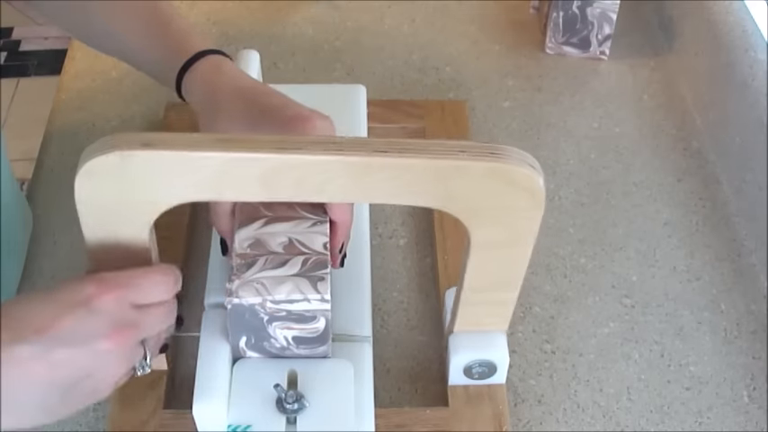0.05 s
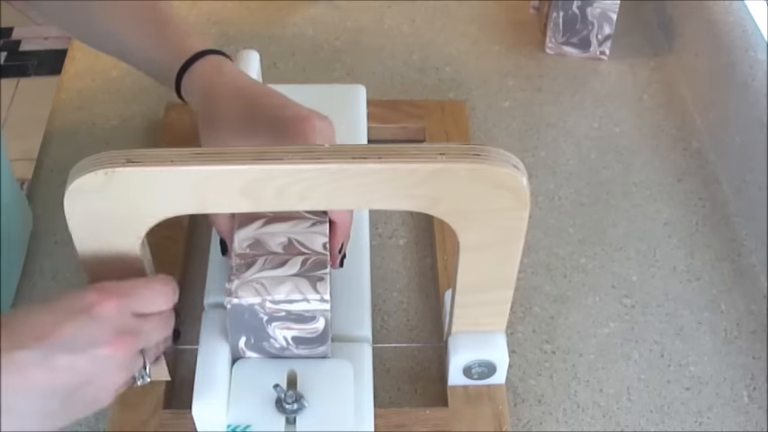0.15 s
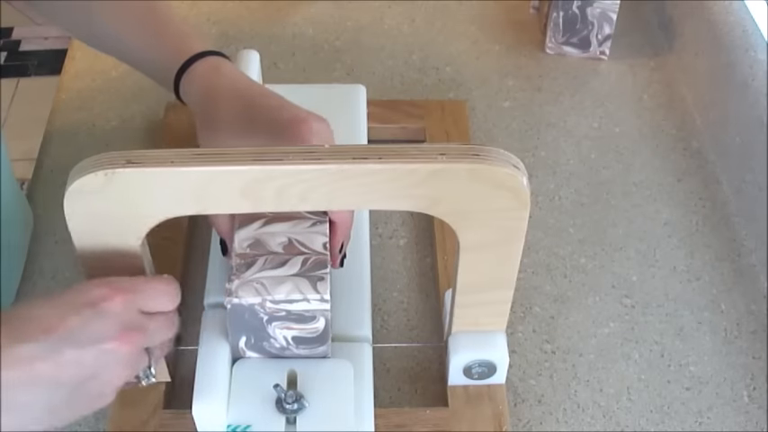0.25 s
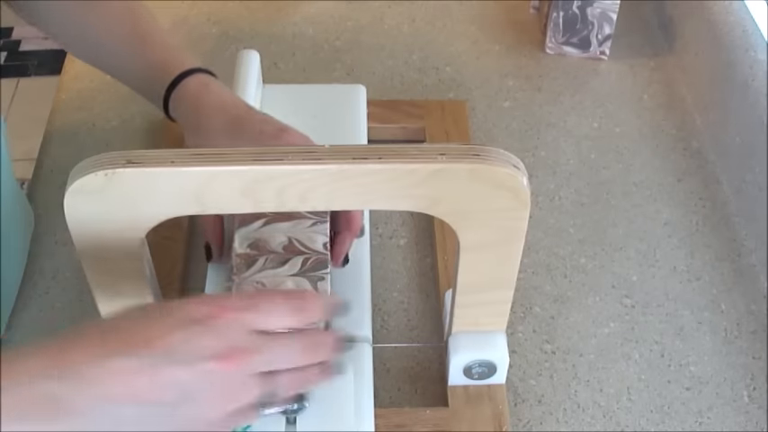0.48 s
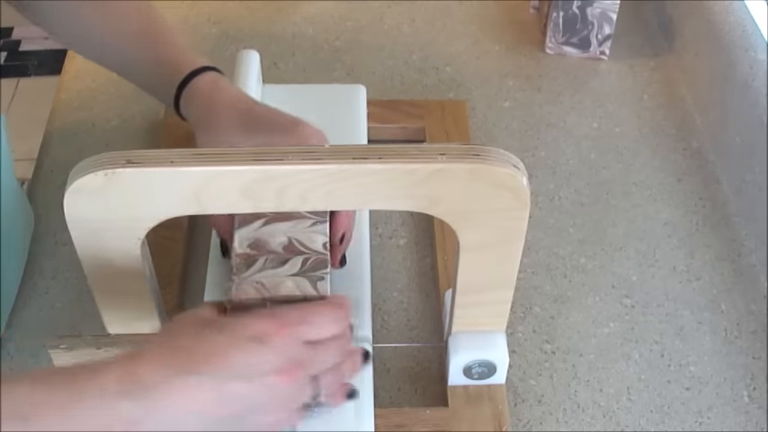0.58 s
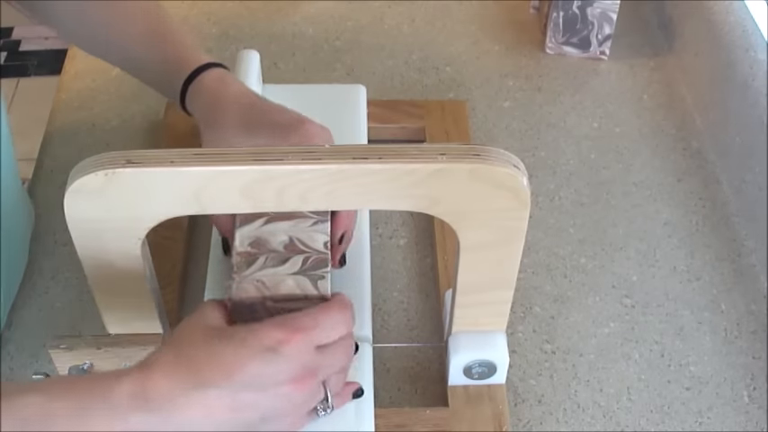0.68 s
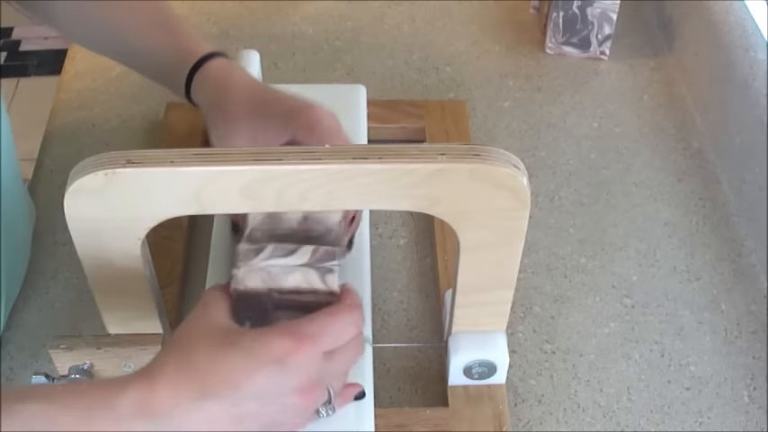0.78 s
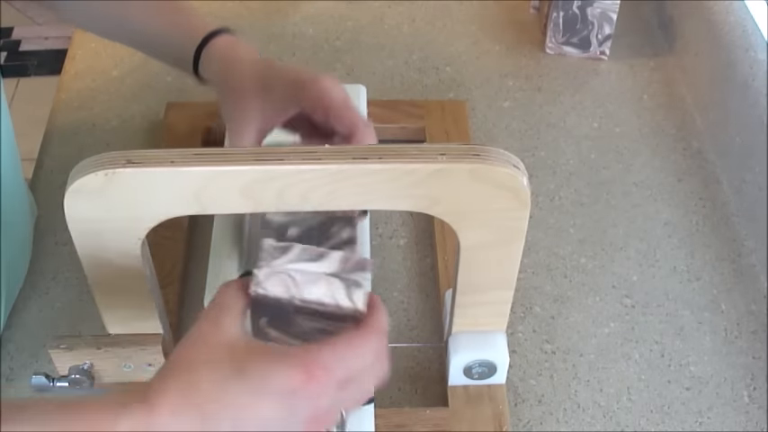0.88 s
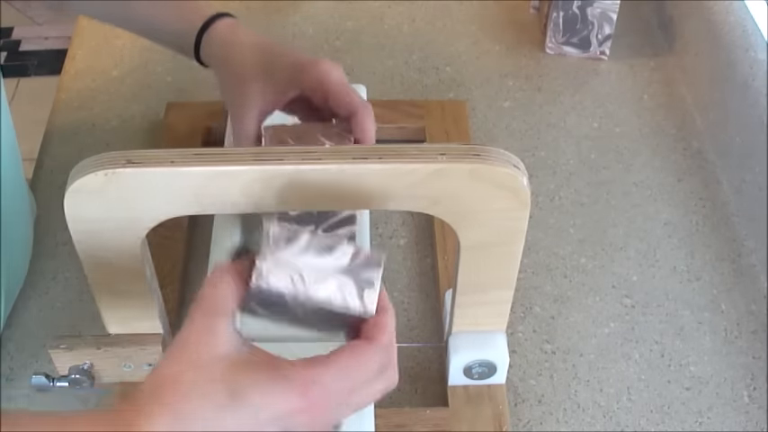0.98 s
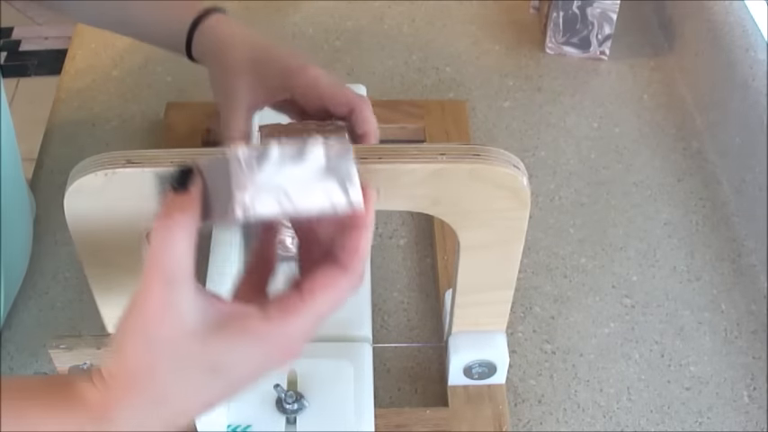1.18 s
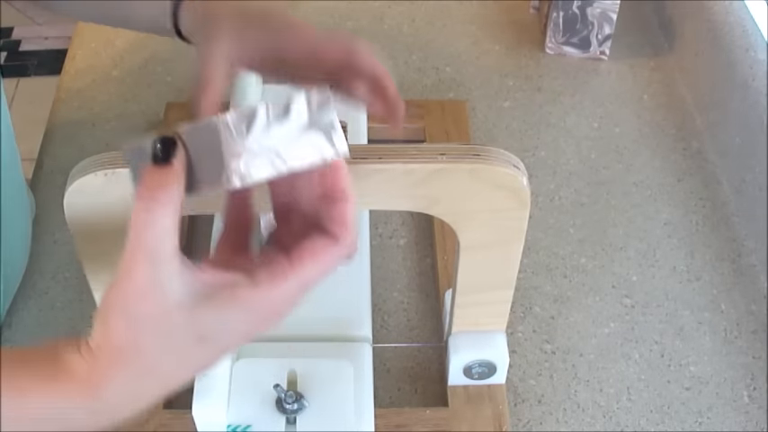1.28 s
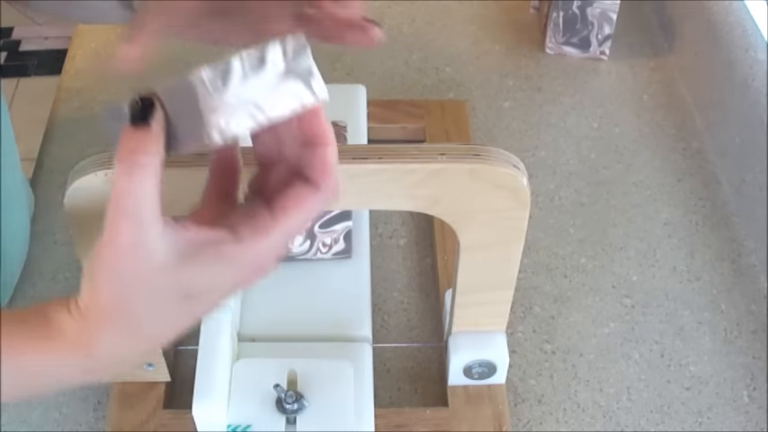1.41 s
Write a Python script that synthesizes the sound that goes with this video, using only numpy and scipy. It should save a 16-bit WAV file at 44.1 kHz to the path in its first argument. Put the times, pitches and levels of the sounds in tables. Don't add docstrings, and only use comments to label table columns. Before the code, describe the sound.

One hard clack of a wire cutter's wooden arm on plastic, with a wiry snap just before

```python
import sys
import numpy as np
from scipy import signal
from scipy.fft import rfft, irfft
from scipy.io import wavfile
from scipy.ndimage import uniform_filter1d

SR = 44100
rng = np.random.default_rng(int(sys.argv[2]) if len(sys.argv) > 2 else 0)


def invert_db(level):
    return 10 ** (np.asarray(level, dtype=float) / 20)


def unload_wav(signal):
    wavfile.write(
        sys.argv[1],
        SR,
        np.round(np.clip(np.atleast_2d(signal).T, -1, 1) * 32767).astype(np.int16),
    )


N = 63945
T = np.arange(N) / SR

# pitch_hz [Hz], level_db [dB per Hz]
AIR_SPECTRUM = [(15, -56), (25, -25), (360, -3.5), (516, -9), (739, -8.5), (1810, -15.5), (5330, -22.5),
                (10600, -28), (11500, -27.5), (15000, -69), (22000, -120)]
AIR_DB, AIR_PATCHY_DB = -53.5, 2

# start_s [s], peak_db [dB], pitch_hz [Hz]
LENS_TICKS = [(.0950, -36, 4600), (.0995, -48, 5500), (.1125, -46, 4600), (.130, -50, 4600),
              (.180, -48, 5500), (.5795, -41, 6000), (1.2470, -40, 4600), (1.2478, -46, 7400),
              (1.2642, -49, 5500), (1.2808, -45, 5000), (1.3143, -46, 4700), (1.348, -51, 5000),
              (1.415, -48, 4900), (1.448, -48, 4800)]
TICK_T60_S, TICK_BROAD_DB = .008, -5

LEAD_END_S, LEAD_DB, LEAD_RISE_S, LEAD_HZ, LEAD_BROAD_DB = .2205, -45, .016, 1000, -3
BOOM_HZ, BOOM_DB, BOOM_CREST_S, BOOM_RISE_S = 174, -34, .305, 0.019

# start_s [s], peak_db [dB]
WIRE_SLAPS = [
    (.2227, -13.5),
    (.2254, -21.5),
    (.2322, -29),
    (.2362, -16.5),
]
# pitch_hz [Hz], level_db [dB], t60_s [s]
WIRE_NOTES = [(654, -7, 0.05), (1230, -3, 0.0082), (2446, -2, 0.023), (3240, -22, .015), (3795, -7, 0.09),
              (3836, -1, 0.048), (4980, 0, 0.015), (5120, -2.5, 0.02), (5640, 3.5, 0.012),
              (7250, -6, 0.021), (8600, -31, 0.024), (11020, -32, 0.013)]
WIRE_DAMP = 0.62
RATTLE_START_S, RATTLE_END_S, RATTLE_DB = .2222, .2415, -16
PING_S, PING_DB, PING_HZ = .2208, -19.5, 6060

# pitch_hz [Hz], t60_s [s]
ROOM_T60 = [(120, 0.38), (300, 1), (600, 0.73), (1500, 0.76), (3000, 0.71), (5500, 0.56), (8000, 0.58),
            (11000, 0.25)]
# pitch_hz [Hz], level_db [dB]
ROOM_COLOUR = [(120, 8), (350, -6), (600, -1.5), (1100, -2), (1700, -4), (2900, -2), (4200, -5),
               (11000, -11)]
WIRE_ROOM_DB, ARM_ROOM_DB, ROOM_BUILD_S = -34, -26.5, 0.006

# start_s [s], peak_db [dB]
ARM_CLACKS = [
    (.2408, -11),
    (.2414, -15),
    (.2430, -26),
]
# pitch_hz [Hz], level_db [dB], t60_s [s]
ARM_NOTES = [(599, -7.5, 0.036), (1264, -3.5, 0.011), (1699, -0.5, .015), (2828, 4, 0.014),
             (3373, 0, 0.015), (4247, 5, 0.024), (6000, -33, 0.002), (8800, -14, .004)]
ARM_DAMP, ARM_ROOM_DAMP = 0.72, 0.51
CRACK_DB, CRACK_S = -11, .0009

# pitch_hz [Hz], level_db [dB], crest_s [s after the clack]
SLAB_NOTES = [(261.2, -17, 0.053), (539, -4, 0.02), (612, -4.5, 0.043), (838, -11.5, 0.075),
              (924.3, -8.5, 0.059), (1205, -8, 0.022), (1490, -1.5, 0.019), (1654, -6, 0.027),
              (1744.5, -7.5, 0.06), (1924, -5.5, 0.02), (2899, 0, 0.037), (3170, -11.5, 0.063)]
BASE_DB, BASE_SHARPNESS = -29.5, 1.94

# start_s [s], full_depth_s [s], above_hz [Hz], spared_share [fraction of lines]
DROPOUTS = [
    (.355, 0, 5600, .03),
    (.973, .002, 2500, .05),
    (1.059, 0, 2500, .05),
    (1.177, .018, 2200, .06),
    (1.400, 0, 2300, .03),
]
DROP_FADE_S, SPARED_GAIN, DROP_TOP_HZ, DROP_LOW_HZ = .016, 4.2, 10400, 150

CUTTER_LOW_HZ, MIC_LOW_HZ, MIC_TOP_HZ = 130, 89, 11300
GAIN_S, GAIN_DB, GAIN_RISE_S, GAIN_SETTLE_S = 0.17, 1, 0.0017, 0.025
PEAK_CEILING = .41


def at_hz(points, hz):
    table = np.array(points)
    return np.interp(np.log(hz), np.log(table[:, 0]), table[:, 1])


def rms_one(x):
    return x / np.sqrt(np.mean(x ** 2) + 1e-20)


def high_pass(x, order, hz):
    return signal.sosfilt(signal.butter(order, hz, "high", fs=SR, output="sos"), x)


def ring(x, hz, t60):
    r = invert_db(-60 / (t60 * SR))
    w = 2 * np.pi * hz / SR
    return signal.lfilter([0, np.sin(w)], [1, -2 * r * np.cos(w), r * r], x + 1e-18)


def bands():
    edges = 25 * 2 ** (np.arange(28) / 3)
    lead_in = 4000
    white = rng.standard_normal((2, N + lead_in))
    out = []
    for k, (low, high) in enumerate(zip(edges, edges[1:])):
        sos = signal.butter(2, [low, high], "band", fs=SR, output="sos")
        out.append((np.sqrt(low * high), signal.sosfilt(sos, white[k % 2])[lead_in:]))
    return out


def strike(hits, modes, damp):
    start_s, peak_db = np.transpose(hits)
    spread_db = rng.normal(0, 2.3, (len(start_s), len(modes)))
    out = 0
    for k, (hz, level_db, t60) in enumerate(modes):
        clicks = np.zeros(N)
        clicks[(start_s * SR).astype(int)] = invert_db(peak_db + spread_db[:, k])
        out = out + (-1) ** k * invert_db(level_db) * ring(clicks, hz, damp * t60)
    return out


def air():
    out = 0
    for hz, band in bands():
        slow = rms_one(uniform_filter1d(rng.standard_normal(N // 100 + 1), size=25))
        drift = np.interp(np.arange(N) / 100, np.arange(len(slow)), slow)
        out = out + invert_db(at_hz(AIR_SPECTRUM, hz) + AIR_PATCHY_DB * drift) * band
    return invert_db(AIR_DB) * rms_one(out)


def ticks():
    length = 400
    out = np.zeros(N)
    noise = rng.choice([-1., 1.], (len(LENS_TICKS), length))
    fade = invert_db(-60 * np.arange(length) / SR / TICK_T60_S)
    for (start_s, peak_db, hz), grit in zip(LENS_TICKS, noise):
        i = int(start_s * SR)
        tone = ring(grit * fade, hz, .002)
        crack = .5 * fade * np.diff(grit, prepend=0)
        tick = tone / abs(tone).max() + invert_db(TICK_BROAD_DB) * crack
        out[i:i + length] += (invert_db(peak_db) * tick)[:N - i]
    return out


def counter():
    waver = rms_one(ring(rng.standard_normal(N), BOOM_HZ, 0.19))
    note = np.sin(2 * np.pi * BOOM_HZ * T) + 0.41 * waver
    boom = invert_db(BOOM_DB) * note / np.cosh((T - BOOM_CREST_S) / BOOM_RISE_S) * (T > LEAD_END_S)
    noise = rng.standard_normal(N)
    lead = rms_one(ring(noise, LEAD_HZ, 0.0013)) + invert_db(LEAD_BROAD_DB) * noise
    growth = np.exp(np.minimum(T - LEAD_END_S, 0) / LEAD_RISE_S) * (T < LEAD_END_S + .002)
    return boom + invert_db(LEAD_DB) * lead * growth


def wire():
    touches = rng.standard_normal(N) * (rng.random(N) < .15)
    rattle = signal.lfilter([1, -.3], [1], touches * (T > RATTLE_START_S) * (T < RATTLE_END_S))
    burst = rng.standard_normal(N) * np.exp(-.5 * ((T - PING_S) / 0.00074) ** 2)
    ping = ring(burst, PING_HZ, 0.00092)
    slaps = strike(WIRE_SLAPS, WIRE_NOTES, WIRE_DAMP)
    return slaps + invert_db(RATTLE_DB) * rattle + invert_db(PING_DB) * ping / abs(ping).max()


def room(x):
    echo = 0
    for hz, band in bands():
        echo = echo + invert_db(at_hz(ROOM_COLOUR, hz) - 60 * T / at_hz(ROOM_T60, hz)) * band
    return signal.fftconvolve(x, echo * (1 - np.exp(-T / ROOM_BUILD_S)))[:N]


def arm(damp):
    late = T - ARM_CLACKS[0][0]
    crack = invert_db(CRACK_DB) * rng.standard_normal(N) * (late > 0) * np.exp(-np.abs(late) / CRACK_S)
    return strike(ARM_CLACKS, ARM_NOTES, damp) + crack


def base():
    late = np.maximum(T - ARM_CLACKS[0][0], 0)
    out = 0
    for hz, level_db, crest_s in SLAB_NOTES:
        waver = rms_one(ring(rng.standard_normal(N), hz, 0.063))
        steady = np.sin(2 * np.pi * (hz * T + rng.random()))
        swell = (late / crest_s * np.exp(1 - late / crest_s)) ** BASE_SHARPNESS
        out = out + invert_db(level_db) * swell * (steady + 0.87 * waver)
    return invert_db(BASE_DB) * out


def starve(x):
    f = np.fft.rfftfreq(N, 1 / SR)
    line = np.minimum(f / 21.5, 599).astype(int)
    for start_s, full_s, above_hz, share in DROPOUTS:
        depth = np.sin(np.pi / 2 * np.clip(1 - (abs(T - start_s) - full_s / 2) / DROP_FADE_S, 0, 1))
        chance = 2 * share * np.linspace(1.6, -.7, 600)
        spared = (rng.random(600) < chance)[line]
        treble = (f > above_hz) & (f < DROP_TOP_HZ)
        keep = np.where(treble, SPARED_GAIN * spared, f > DROP_LOW_HZ)
        x = (1 - depth ** 2) * x + depth * irfft(rfft(depth * x) * keep, N)
    return x


def scene():
    snap = wire()
    wet = room(invert_db(WIRE_ROOM_DB) * snap + invert_db(ARM_ROOM_DB) * arm(ARM_ROOM_DAMP))
    cutter = high_pass(snap + arm(ARM_DAMP) + wet, 3, CUTTER_LOW_HZ)
    return (cutter + base() + counter() + ticks() + air())[None]


def roll_off(x):
    return signal.sosfilt(signal.butter(12, 11940, fs=SR, output="sos"), x)


def record(dry):
    late = np.maximum(T - GAIN_S, 0)
    gain_db = GAIN_DB * (0.5 - np.exp(-late / GAIN_RISE_S)) * np.exp(-late / GAIN_SETTLE_S)
    x = high_pass(dry, 1, MIC_LOW_HZ) * invert_db(gain_db)
    x = starve(x / (1 + (x / PEAK_CEILING) ** 4) ** .25)
    x = signal.sosfilt(signal.cheby2(20, 50, MIC_TOP_HZ, fs=SR, output="sos"), x)
    return roll_off(x)


dry = scene()
out = record(dry)
unload_wav(out)
```